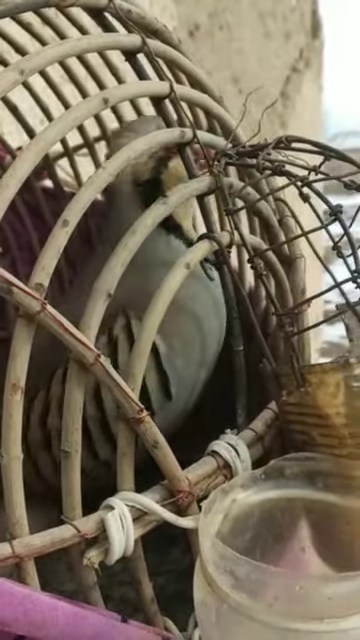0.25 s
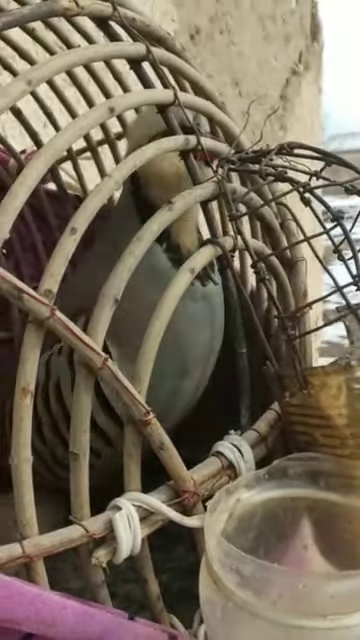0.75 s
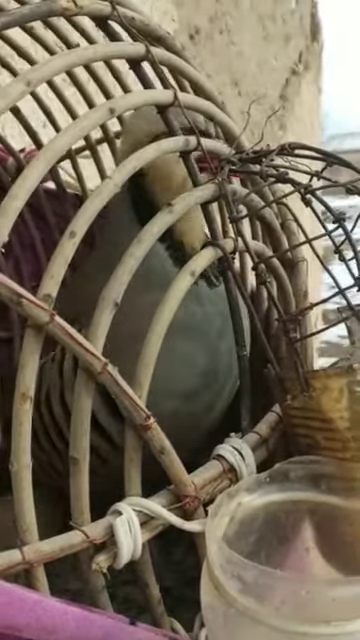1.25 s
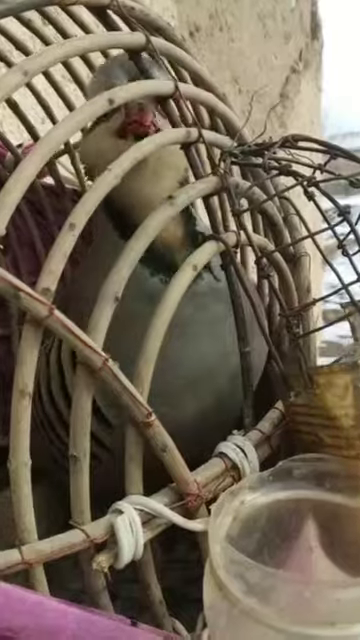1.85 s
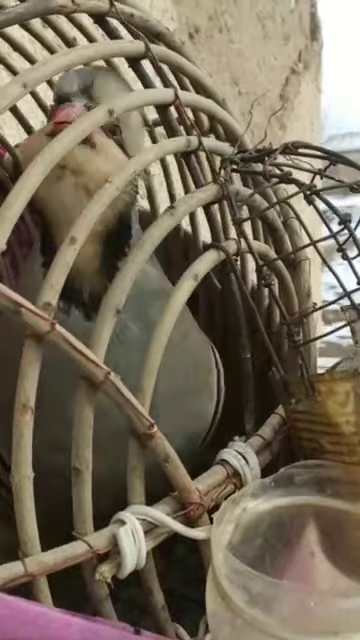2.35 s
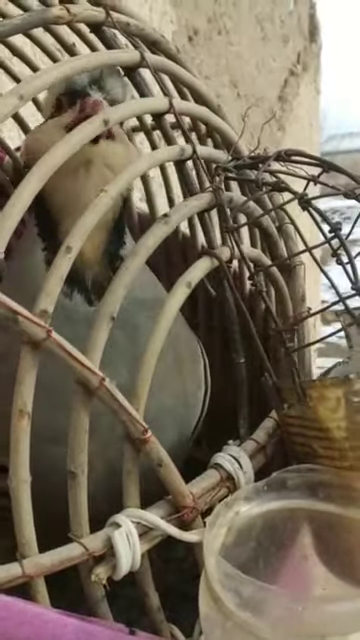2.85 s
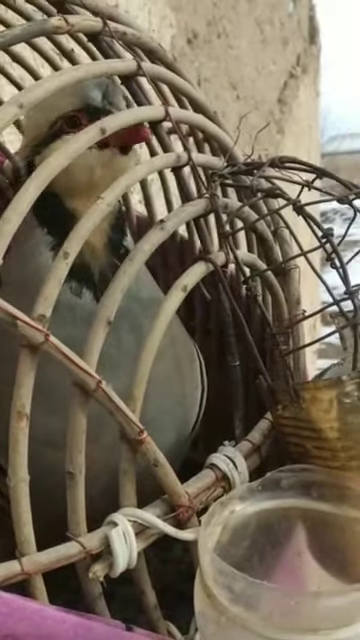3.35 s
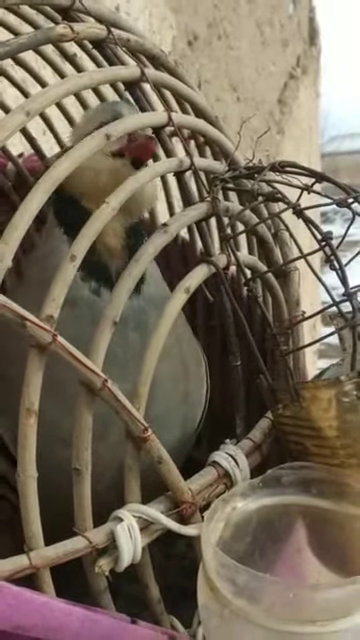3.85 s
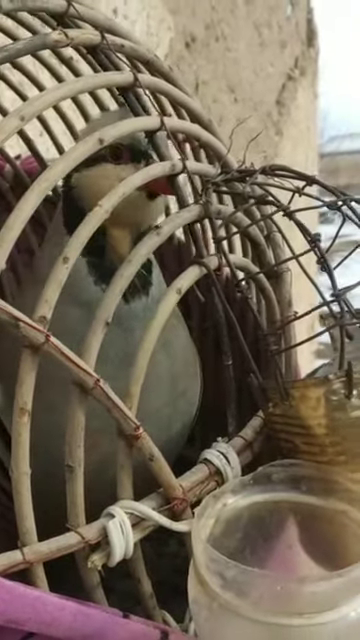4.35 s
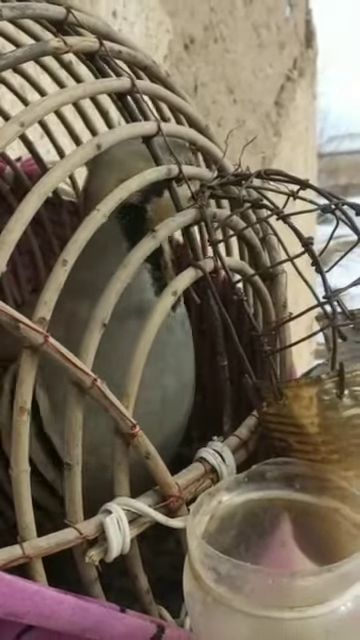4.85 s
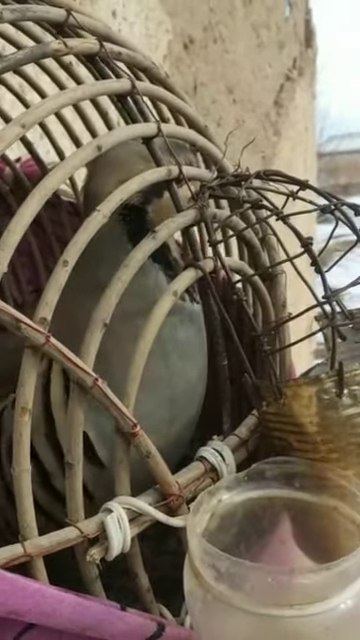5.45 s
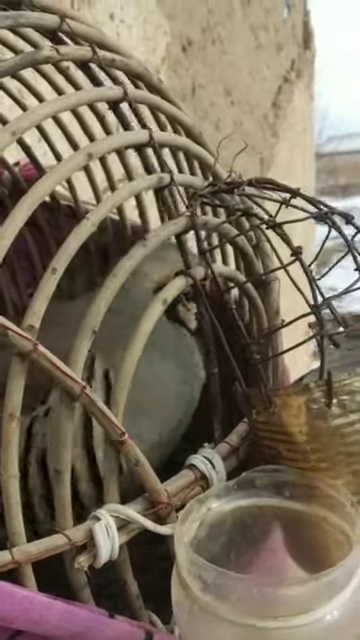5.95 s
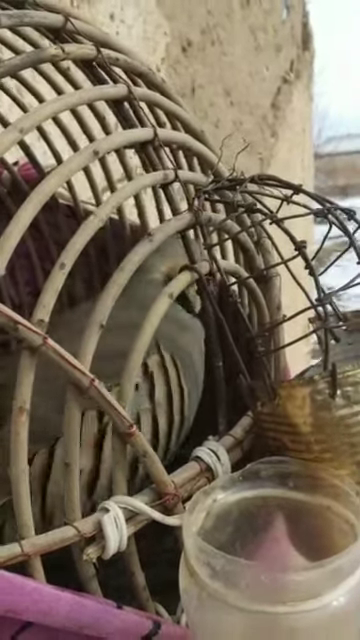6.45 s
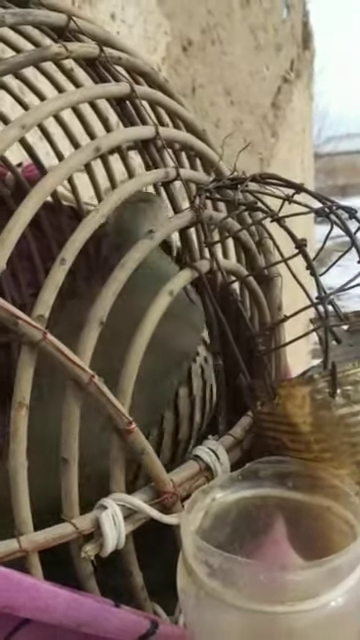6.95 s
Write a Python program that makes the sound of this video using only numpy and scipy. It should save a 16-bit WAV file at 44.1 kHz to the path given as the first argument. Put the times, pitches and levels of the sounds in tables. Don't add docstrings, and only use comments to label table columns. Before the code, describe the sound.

A caged partridge fires off a fast run of loud, hoarse chucks, then turns and eases into softer, rising squeals and whines in a quiet yard.

```python
import sys
import numpy as np
from scipy import signal
from scipy.fft import rfft, irfft
from scipy.io import wavfile
from scipy.ndimage import uniform_filter1d

SR = 44100
rng = np.random.default_rng(int(sys.argv[2]) if len(sys.argv) > 2 else 0)


def file_out(sig):
    cols = np.atleast_2d(sig).T
    lim = np.clip(cols, -1, 1)
    pcm = np.round(lim * 32767).astype(np.int16)
    wavfile.write(sys.argv[1], SR, pcm)


def volts_from_decibels(level):
    exponent = np.asarray(level, float) / 20
    return 10 ** exponent


N = 317520

# time in seconds, throat shift in octaves, treble in dB.
NECK = [(0, -0.06, -7), (.3, 0.041, -3.5), (.6, 0, -0.5), (1, -.03, -1), (1.4, .01, -1.5), (1.8, 0.013, 0),
        (2.1, -.06, -1.5), (2.5, -.06, 3.5), (2.9, -0.072, -2.5), (3.17, 0.044, -1.5), (3.6, -0.023, 0.5),
        (4.1, -0.049, -2.5), (4.8, 0.028, -1.5), (5.25, 0.0066, 2), (5.7, 0, 2), (6.1, -0.0013, -0.5),
        (6.6, 0.0099, 0), (7.2, -0.044, 0)]
# time in seconds, share of the front colour 0-1.
FACING = [(3.1, 0), (3.42, 1)]
RISE_S = .0055


def evened(x, size=None):
    if size is None:
        power = np.mean(x ** 2)
    else:
        power = abs(uniform_filter1d(x ** 2, size))
    return x / np.sqrt(power + 1e-20)


def read(points, hz):
    f, value = np.transpose(points)
    return np.interp(np.log(hz + 1), np.log(f + 1), value)


def hush():
    # frequency in Hz, level in dB per Hz.
    air = [(12, -72), (20, 8.5), (91, -20), (206, -26), (2730, -32.5), (6910, -36.5), (13900, -42),
           (16500, -45.5)]
    # frequency in Hz, left-right correlation 0-1.
    same_points = [(40, 0.67), (300, 0.37), (3000, .1)]
    frames, hz = N // 256 + 5, np.fft.rfftfreq(1024, 1 / SR)
    a, b, c, d, patches = rng.standard_normal((frames, 513, 5)).T
    patches = uniform_filter1d(patches, size=10, axis=0)
    patches = evened(uniform_filter1d(patches, size=12, axis=1))
    same = np.clip(read(same_points, hz), -1, 1)[:, None]
    left, other = a + 1j * b, c + 1j * d
    z = np.array([left, same * left + np.sqrt(1 - same ** 2) * other])
    z *= volts_from_decibels(read(air, hz)[:, None] + 2.0 * patches)
    noise = signal.istft(z, nperseg=1024, noverlap=768)[1][:, :N]
    return volts_from_decibels(-51) * evened(noise)


def steady_kinds():
    # start in seconds, length in seconds, effort in dB, pitch from in Hz, pitch to in Hz.
    chucks = [(.114, 0.038, -10.5, 752.3, 329.2), (.533, 0.027, -5, 731, 330.4),
              (.504, .022, -10, 749, 518.6), (.711, 0.034, -6.5, 489.6, 383.5),
              (.932, 0.032, -5.5, 695.8, 334.5), (1.213, 0.018, -6.5, 821.2, 500),
              (1.857, 0.02, -8.5, 708.7, 480.5), (1.88, 0.026, -4.5, 599.4, 326.5),
              (2.116, .022, -4.5, 607.7, 378), (2.142, 0.03, -9, 366.8, 267.3),
              (2.395, 0.0099, -7.5, 814, 517.6), (2.871, 0.022, -8, 364.6, 272.3),
              (1.706, .03, -7, 641, 330.5)]
    dives = [(.271, 0.033, -8.5, 785.8, 347), (.685, 0.022, -5, 598, 419.2),
             (1.097, 0.031, -6.5, 799.8, 396.8), (1.304, 0.028, -6.5, 556, 312.4),
             (1.457, 0.031, -8.5, 660, 300.1), (2.284, 0.032, -9, 500, 368.9),
             (2.476, 0.026, -7, 482.3, 340.2), (2.63, 0.03, -8, 634.6, 305.9),
             (2.846, 0.02, -8, 689.5, 411.4)]
    clucks = [(3.544, .027, -43, 762.4, 400.2), (.018, 0.037, -19, 488.7, 473.1),
              (.407, 0.025, -15, 454.4, 471), (.832, 0.028, -12.5, 677, 445.9),
              (1.235, 0.023, -16.5, 487.4, 483.7), (1.576, 0.026, -13.5, 551.5, 452.8),
              (2.017, 0.023, -12.5, 563.7, 455.7), (2.411, 0.027, -13, 500, 483.5),
              (2.738, 0.021, -10.5, 841.6, 486.6)]
    leads = [(.483, 0.014, -16.5, 647.8, 604.9), (.67, 0.014, -13.5, 642.3, 599.4),
             (1.399, 0.015, -11, 584, 542.9), (1.292, .007, -24, 600, 561.3),
             (2.093, 0.015, -21, 606.3, 593), (2.272, 0.0083, -9.5, 595.6, 567.3),
             (2.38, 0.0088, -21.5, 602.6, 704.3), (2.58, 0.04, -13.5, 602.7, 558.4),
             (3.099, 0.031, -13, 620.6, 560), (3.128, 0.031, -12.5, 482.4, 559.7),
             (5.2, 0.027, -27.5, 500, 616.8), (5.402, 0.018, -19.5, 453, 500)]
    trails = [(.216, 0.044, -18.5, 622.8, 600), (.562, .01, -23, 399, 328),
              (1.418, 0.021, -18, 537.6, 466.5), (6.222, .018, -38.5, 850.7, 857),
              (2.94, .06, -40, 640.9, 639.9), (.381, 0.013, -20, 701.5, 667.8),
              (1.132, 0.034, -13, 525, 523.2), (1.608, 0.057, -14, 803, 500),
              (1.792, .034, -17.5, 758, 601), (1.916, 0.025, -17.5, 481.6, 450),
              (2.447, 0.014, -18, 471.5, 384.3), (2.785, 0.041, -29.5, 649, 646),
              (2.915, 0.042, -25.5, 586.5, 563), (3.306, 0.04, -24.5, 694, 649),
              (3.366, 0.0023, -38, 602.6, 500), (3.885, 0.021, -33.5, 590.8, 580),
              (4.216, 0.03, -25.5, 547, 500), (4.925, 0.019, -37.5, 701.3, 646),
              (5.078, 0.034, -27.5, 638, 571.3), (.062, 0.028, -33.5, 639.7, 558.8),
              (6.595, 0.013, -37, 688.6, 582.5)]
    yaps = [
        (3.466, .025, -18, 588.8, 605.7),
        (3.724, .014, -19, 596.5, 639.5),
        (3.826, 0.05, -18.5, 625.5, 599),
    ]
    rasps = [
        (3.158, .05, -21.5, 758.5, 636.4),
        (5.859, 0.038, -46.5, 797.4, 592.2),
        (5.91, 0.038, -66, 599.4, 500),
        (6.28, 0.017, -59, 599.5, 500),
        (7.068, 0.02, -48, 670, 561),
        (6.7, 0.059, -44.5, 818, 601.2),
    ]
    scoops = [
        (1.678, 0.02, -3, 561.1, 632.9),
        (3.053, .012, -7, 540.7, 600.6),
        (3.071, 0.0071, -7, 595, 644),
    ]
    # part of the note 0-1, level in dB, glide 0-1, roughness 0-1,
    # throat in Hz, windpipe overtones in dB under the effort.
    chuck = [(0, 3.5, 0.03, 0.62, 1496, -21), (.25, -2.5, 0.36, 0.49, 1494, -8.5),
             (.6, -3.5, .7, 0.4, 1450, -11), (1.001, -7.5, 1, 0.38, 1356, -20)]
    dive = [(0, -3.5, 0, 0.46, 1710, -21), (.25, 3.5, 0.35, 0.36, 1542, -15),
            (0.601, -3, .7, 0.28, 1410, -14), (0.999, -7.5, 0.97, 0.29, 1214, -14.5)]
    cluck = [(0, 3.5, 0.041, 0.85, 1457, -8), (0.201, 4.5, 0.62, 0.53, 1428, -9),
             (0.501, 5, 0.87, .2, 1469, -5), (1, -5, 0.99, 0.083, 1172, -6.5)]
    lead = [(0, -17.5, .011, .6, 1752, -11), (1, -4, 1, .55, 1423, -13.5)]
    trail = [(0, -3, .061, .4, 1601, -10), (1, -8.5, 1, .35, 1343, -13)]
    yap = [(0, -4, 0.012, .5, 1278, -3), (0.598, 1.5, 1, .65, 1335, -2.5), (0.999, -4, 1, .6, 1220, -1.5)]
    rasp = [(0, 4, 0.057, .6, 1538, -2.5), (0.549, 7.5, .4, .6, 1333, 0.86), (0.998, 2.5, 1, .7, 1150, -2)]
    scoop = [(0, -15, 0.0092, .45, 1137, -15.5), (0.999, 1, 1, .4, 1365, -11.5)]
    return dict(chuck=(chucks, chuck), dive=(dives, dive), cluck=(clucks, cluck), lead=(leads, lead),
                trail=(trails, trail), yap=(yaps, yap), rasp=(rasps, rasp), scoop=(scoops, scoop))


def opening_kinds():
    # start in seconds, length in seconds, effort in dB, pitch from in Hz, pitch to in Hz.
    arcs = [(3.425, 0.042, -21, 559.4, 900), (3.925, 0.024, -19.5, 522.4, 688.6),
            (4.99, 0.039, -22.5, 479, 761.6), (5.424, 0.024, -21.5, 474.2, 657.3),
            (5.817, 0.026, -23, 381.3, 637.4), (6.24, .036, -27, 526.6, 640.6),
            (6.41, 0.027, -36, 743.7, 820), (7.022, 0.038, -27.5, 529, 680.6)]
    arches = [
        (3.636, .07, -18.5, 796.9, 641.5),
        (4.853, .066, -22.5, 801, 637.4),
    ]
    moans = [
        (3.968, .078, -21, 558, 440),
        (4.252, 0.071, -20.5, 545.3, 440),
        (4.585, .075, -18.5, 509, 430),
        (5.498, .055, -23.5, 563, 430),
    ]
    squeals = [
        (4.092, .076, -17, 577.5, 900),
        (4.382, .084, -17, 618.9, 931.8),
    ]
    drops = [
        (4.172, 0.035, -20, 789.5, 604.5),
        (4.47, 0.049, -17.5, 832, 622.3),
        (5.316, .044, -22.5, 759.2, 650.6),
        (5.712, .036, -22, 754.2, 634.3),
        (6.901, 0.04, -25, 1046, 650.5),
    ]
    cries = [
        (4.767, 0.075, -23, 600.3, 1003),
        (5.222, 0.081, -21.5, 601.6, 1005),
        (5.631, .073, -21, 593.7, 1024),
        (6.816, 0.08, -24.5, 725.6, 1111),
    ]
    whines = [
        (6.004, .156, -17, 640, 1144),
        (6.455, .125, -18, 638.6, 1145),
    ]
    chirps = [
        (6.962, 0.064, -36.5, 765, 1588),
    ]
    # part of the note 0-1, level in dB, glide 0-1, roughness (over 1 is air),
    # throat as a multiple of the pitch, windpipe overtones in dB under the effort.
    arc = [(0, -13.5, 0.0088, .4, 2.4, -6.5), (.6, 1, 1, .45, 2.2, -8.5), (1, -5, .7, .55, 2.2, -1)]
    arch = [(0, -7.5, .8, .5, 2.2, -22.5), (.25, 2, .5, 0.6, 2.1, -7), (0.552, 2, 0, .55, 2.02, -4),
            (1, -8.5, 1, .55, 2.02, -20)]
    moan = [(0, -10.5, .9, .5, 3.02, -15.5), (0.199, -3.5, .3, .4, 3.01, -6),
            (.4, -0.5, 0, .25, 3.01, -21.5), (.62, -3, .8, .3, 3.01, -16.5), (.75, -14, 1.1, .5, 3.05, -14),
            (1, -17, 1.2, .7, 3.3, -17.5)]
    squeal = [(0, -21.5, 0.015, .35, 1.5, -13), (0.118, -3, .15, .3, 2.02, -0.5), (0.3, 3, .3, .3, 1.8, 1),
              (0.5, 3, .8, .4, 1.8, 3), (.62, -9, 1, 1.6, 2.2, 4.5), (1.002, -15.5, 0.96, 1.8, 2.2, 1.5)]
    drop = [(0, -3.5, 0.0023, 0.45, 2.05, -2.5), (0.348, 2.5, .6, .4, 2.03, -1.5),
            (1.003, -7.5, 1, .5, 2.02, -4.5)]
    cry = [(0, -18, 0.0, .4, 1.37, -10), (.1, 3, .15, 0.43, 2.02, -2), (.2, 6, .4, .35, 2, -1),
           (.37, 9.5, 0.93, .4, 2.01, -3), (.46, -2, 0.97, 1.6, 1.7, 4.5), (.8, -13, 1, 1.8, 1.6, 15.5),
           (0.999, -11, .9, 1.8, 1.6, -1.5)]
    whine = [(0, -36.5, 0.017, 0.34, 1.5, -14), (.06, -6.5, .3, .3, 1.7, -2),
             (0.171, -2, .85, 0.35, 2.02, -2.5), (0.249, -3.5, 0.95, 1.8, 2.6, -1.5),
             (0.65, -11.5, 1, 1.8, 2.6, -5.5), (0.74, -9, 0.99, .4, 2.02, -4),
             (.87, -7.5, .25, 0.4, 1.8, -3.5), (1.001, -13, 0.2, 0.43, 1.9, -3.5)]
    chirp = [(0, 4.5, 0.088, 0.97, 3.1, -1), (0.449, 3.5, 0.76, 0.94, 3.1, -14), (1.001, 1, 1, .9, 3.2, -1)]
    return dict(moan=(moans, moan), arch=(arches, arch), arc=(arcs, arc), squeal=(squeals, squeal),
                cry=(cries, cry), drop=(drops, drop), whine=(whines, whine), chirp=(chirps, chirp))


def notes():
    # gullet in dB, throat's octave in dB,
    # beak hiss in dB, narrow ring of the throat in dB.
    sides_db = dict(chuck=(0.5, -4, -1, 3.5), dive=(-2.5, 0.5, -12, 5.5), cluck=(4.5, 6.5, 2.5, -7.5),
                lead=(3, 4.5, 13.5, -19.5), trail=(0.5, -17, 2.5, -6.5), yap=(-0.5, 3, -9, -32),
                rasp=(6.5, -23, -2, 0), moan=(-6.5, 9, 22, 4.5), arch=(1, -3, 0, -30),
                arc=(8, 12, -15, -76), squeal=(-2, 11, 26, -35), cry=(-3, -12, 29, 6),
                drop=(-0.5, -1.5, -12, -52), whine=(1, -14.5, 20.5, -31.5), chirp=(13, -12, -18, -25),
                scoop=(-5.5, 14, 4, -4.5))
    opening = opening_kinds()
    neck_s, neck_octaves, _ = np.transpose(NECK)
    out = []
    for kind, (rows, shape) in {**steady_kinds(), **opening}.items():
        part, db, glide, rough, throat, upper_db = np.transpose(shape)
        sides = np.outer(sides_db[kind], np.ones(len(part)))
        for start, length, effort_db, from_hz, to_hz in rows:
            hz = from_hz * (to_hz / from_hz) ** glide
            if kind in opening:
                throat_hz = throat * hz
            else:
                throat_hz = throat * 2 ** np.interp(start, neck_s, neck_octaves)
            s = start + part * length
            out.append(np.array([s, effort_db + db, hz, rough, throat_hz, upper_db, *sides]))
    return sorted(out, key=lambda note: note[0, 0])


def effort(t):
    rise_db, fall_s, fall_db = 30, 0.015, 47
    out = np.zeros(N)
    for s, db, *_ in notes():
        s = np.r_[s[0] - 3 * RISE_S, s[0] - RISE_S, s, s[-1] + fall_s, s[-1] + 3 * fall_s]
        db = np.r_[db[0] - 45, db[0] - rise_db, db, db[-1] - fall_db, db[-1] - 60]
        out = np.maximum(out, volts_from_decibels(np.interp(t, s, db, -150, -150)))
    return out


def syrinx(hz, rough):
    wander = evened(uniform_filter1d(rng.standard_normal(N), size=120))
    turns = np.cumsum(hz * np.exp((0.0061 + 0.35 * rough ** 2) * wander)) / SR
    pulses = sum(np.cos(2 * np.pi * k * turns) * (k * hz < 16500) / k ** 0.15 for k in range(1, 36))
    size_db = 4 * rough * rng.standard_normal(N)[turns.astype(int)]
    puffs = (0.03 + np.exp(-(turns % 1) / 0.28)) * rng.standard_normal(N)
    air = np.clip(0.1 + 0.3 * rough ** 2, 0, 1)
    mix = np.sqrt(1 - air) * evened(pulses, size=900) + np.sqrt(air) * evened(puffs)
    return volts_from_decibels(size_db) * mix


def resonate(x, hz, width):
    turn = np.exp(2j * np.pi * np.cumsum(hz * np.ones(len(x))) / SR)
    r = np.exp(-np.pi * width / SR)
    smooth = signal.lfilter([(1 - r) ** 2], [1, -2 * r, r * r], x / turn + 1e-18)
    return 2 * (turn * smooth).real


def body(x, modes):
    return sum((-1) ** k * volts_from_decibels(db) * resonate(x, hz, width) for k, (hz, width, db) in enumerate(modes))


def colour(x, points):
    hz = np.fft.rfftfreq(N, 1 / SR)
    smear = np.exp(-1j * (hz / 1500) ** 2)
    return irfft(rfft(x) * volts_from_decibels(read(points, hz)) * smear, N)


def patchy(x):
    dent_db, band_db = 3.5, 4.0
    hz, _, z = signal.stft(x, SR, nperseg=512)
    fine, broad = rng.standard_normal((*z.shape, 2)).transpose(2, 0, 1)
    dents = uniform_filter1d(uniform_filter1d(fine, size=3, axis=0), size=7, axis=1)
    dents = evened(dents - uniform_filter1d(dents, size=11, axis=0))
    bands = evened(uniform_filter1d(uniform_filter1d(broad, size=22, axis=0), size=9, axis=1))
    bands = bands * (hz > 6200)[:, None]
    return signal.istft(z * volts_from_decibels(dent_db * dents + band_db * bands), SR, nperseg=512)[1][:N]


def partridge():
    # frequency in Hz, width in Hz, level in dB.
    crop = [(297, 160, -18), (500, 1120, 3.5), (900, 353, 15)]
    # frequency in Hz, level in dB.
    behind_points = [(1800, -19.5), (2900, -8), (3600, -24), (4300, -9), (5500, 0), (6100, -9), (6600, -18),
                     (8200, -26), (9800, -29.5), (11500, -26), (14500, -25)]
    # frequency in Hz, level in dB.
    front_points = [(1500, -16), (2100, 9), (4000, 7.5), (5200, 3.5), (6200, -4), (7500, -5.5),
                    (10000, -33.5), (12000, -19.5), (15000, -31)]
    t = np.arange(N) / SR
    s, _, *columns = np.hstack(notes())
    hz, rough, throat_hz, upper_db, crop_db, octave_db, hiss_db, ring_db = (
        np.interp(t, s, c) for c in columns)
    rough = np.clip(rough, 0, 2.5)
    beak = np.log2(throat_hz / 1400)
    front = np.interp(t, *np.transpose(FACING))
    drive = syrinx(hz, rough * np.clip(1 - .45 * beak, .3, 1))

    throat = resonate(resonate(drive, throat_hz, 1075), throat_hz, 884)
    throat = evened(throat, size=900)
    ring = evened(resonate(throat, throat_hz, 380), size=900)
    throat = throat + volts_from_decibels(ring_db) * ring
    gullet = resonate(body(drive, crop), 305, 1066)
    gullet_db = crop_db - 10 - 8 * np.minimum(rough, 1) - 30 * np.minimum(beak, .9)
    gullet_db = gullet_db + 5 * front
    lower = evened(throat, size=900) + volts_from_decibels(gullet_db) * evened(gullet, size=900)

    rasp = drive + .55 * rng.standard_normal(N)
    upper = (1 - front) * evened(colour(drive, behind_points), size=900)
    upper += front * evened(colour(rasp, front_points), size=900)
    octave = evened(resonate(drive, 2 * throat_hz, 505.0), size=900)
    upper += volts_from_decibels(octave_db - 23.0 + 18.6 * beak - 60 * np.maximum(beak - 1.1, 0)) * octave
    hiss = evened(body(rng.standard_normal(N), [(11980, 2300, -0.22), (15300, 710, -1.77)]))
    upper += volts_from_decibels(hiss_db - 59.5 + 27.0 * np.minimum(beak, 1.25)) * hiss
    neck_s, _, treble_db = np.transpose(NECK)
    upper = patchy(upper) * volts_from_decibels(np.interp(t, neck_s, treble_db) - 2)

    lower_share = np.sqrt(np.clip(1 - volts_from_decibels(2 * upper_db), .15, 1))
    return effort(t) * (lower_share * evened(lower, size=900) + volts_from_decibels(upper_db) * upper)


def wall(x):
    # frequency in Hz, t60 in seconds.
    decay = [(300, 0.17), (900, 0.11), (1500, 0.12), (2300, 0.11), (5000, 0.092), (10000, 0.14)]
    taps = np.zeros((2, SR // 2))
    at = np.arange(200, SR // 2 - 20, 20)
    at = at + rng.integers(0, 20, (2, len(at)))
    np.put_along_axis(taps, at, rng.choice([-1., 1.], at.shape), 1)
    hz, t, z = signal.stft(taps, SR, nperseg=256)
    tail = signal.istft(z * volts_from_decibels(-60 * t / read(decay, hz)[:, None]), SR, nperseg=256)[1]
    return signal.fftconvolve(x[None], tail / np.linalg.norm(tail[0]), axes=1)[:, :N]


def scatter(x):
    # frequency in Hz, random phase between the ports in radians.
    port_blur = [(300, 0.3), (3000, 0.66), (8000, 0.94), (15000, 0.77)]
    hz, _, z = signal.stft(x, SR, nperseg=256)
    chance = uniform_filter1d(rng.standard_normal(z.shape[1:]), size=4, axis=0)
    chance = evened(uniform_filter1d(chance, size=3, axis=1))
    side = np.array([.5, -.5])[:, None, None]
    shift = np.exp(1j * side * read(port_blur, hz)[:, None] * chance)
    return signal.istft(z * shift, SR, nperseg=256)[1][:, :N]


def whistle(rows, octave_db):
    # part of the note 0-1, level in dB, share of the top pitch.
    pipe = [(0, -8, .88), (.15, 0, .96), (.4, 0, 1), (.68, -2, .985), (.82, -7, .94), (1, -11, .72)]
    beat_share = .295
    t, out = np.arange(N) / SR, np.zeros(N)
    waver, flutter, beat = (
        evened(uniform_filter1d(uniform_filter1d(rng.standard_normal(N), size=200), size=100))
        for _ in range(3))
    part, shape_db, share = np.transpose(pipe)
    for start, length, db, top_hz, side_db in rows:
        s = start + part * length
        turn = 2 * np.pi * np.cumsum(top_hz * np.interp(t, s, share) * np.exp(.012 * waver)) / SR
        under = 2 * np.pi * np.cumsum(beat_share * top_hz * np.exp(.03 * beat)) / SR
        edge_s = np.r_[s[0] - RISE_S, s, s[-1] + RISE_S]
        envelope_db = np.interp(t, edge_s, np.r_[-60, shape_db, -60], -150, -150)
        level = volts_from_decibels(db + 3.0 * flutter + envelope_db)
        for k, gain in ((1, 0.96), (2, volts_from_decibels(octave_db))):
            out += level * gain * (np.cos(k * turn) + volts_from_decibels(side_db) * np.cos(k * turn - under))
    return np.sqrt(2) * out


def second_membrane():
    # start in seconds, length in seconds, level in dB, top in Hz, sideband in dB.
    pipes = [
        (4.138, 0.043, -30.5, 2727, 3),
        (4.418, 0.059, -21.5, 2836, -8.5),
        (4.797, 0.048, -24, 3039, -11),
        (5.245, .07, -19.5, 2916, -4.5),
        (5.655, .055, -23, 2925, -0.5),
        (6.843, 0.067, -23.5, 3455, -30),
    ]
    thin_pipes = [
        (6.028, .095, -24, 3300, -5),
        (6.478, .068, -25, 3380, -2.5),
    ]
    return whistle(pipes, octave_db=-1.5) + whistle(thin_pipes, octave_db=-15)


def scene():
    # frequency in Hz, left minus right in dB.
    ports = [(380, -1), (1400, -1.7), (3000, 6.5), (4600, 4.5), (8000, -3), (15000, -6.5)]
    # time in seconds, left minus right in dB.
    drift = [(0, -2), (.7, -0.5), (1.6, -0.5), (3, 0.7), (3.7, -0.5), (4.2, 0.5), (5.6, -3.5), (6.2, 0.5),
             (7.2, -5)]
    # frequency in Hz, phase in radians.
    lag = [(0, 0), (2070, 1.9), (4700, 6.2), (13200, 24), (17000, 31)]
    bird = partridge() + second_membrane()
    t, hz = np.arange(N) / SR, np.fft.rfftfreq(N, 1 / SR)
    side = np.array([[.5], [-.5]])
    small_body = np.hypot(1, (230 / (hz + 1)) ** 4)
    tone = rfft(bird) * volts_from_decibels(side * read(ports, hz)) / small_body
    late = side * np.interp(hz, *np.transpose(lag))
    front = np.interp(t, *np.transpose(FACING))
    direct = (1 - front) * irfft(tone * np.exp(-1j * late), N)
    direct = direct + front * irfft(tone * np.exp(-.85j * late), N)
    direct = scatter(direct) * volts_from_decibels(side * np.interp(t, *np.transpose(drift)))
    return direct + volts_from_decibels(-16.5) * wall(bird) + hush()


def gate(x):
    gate_db, cut_db, from_hz = 5.9, -35, 2500
    chance_db, db_per_octave = 3.2, 1.8
    hz, _, z = signal.stft(x, SR, nperseg=2048)
    power = (abs(z) ** 2).mean(0)
    db = 10 * np.log10(uniform_filter1d(power, size=10, axis=0)[::10] + 1e-16)
    chance = evened(uniform_filter1d(rng.standard_normal(db.shape), size=2, axis=1))
    under_db = uniform_filter1d(db, size=9, axis=0) - db + chance_db * chance
    under_db = np.repeat(under_db, 10, axis=0)[:len(hz)]
    octaves = np.log2((hz[:, None] + 1) / from_hz)
    shut = (under_db > gate_db - db_per_octave * octaves) & (octaves > 0)
    return signal.istft(z * volts_from_decibels(cut_db * shut), SR, nperseg=2048)[1][:, :N]


def roll_off(x):
    return signal.sosfilt(signal.butter(12, 16980, fs=SR, output="sos"), x)


def record(dry):
    held = np.tanh(dry * 1.1) / 1.1
    top_edge = signal.ellip(8, .5, 70, 16200, fs=SR, output="sos")
    held = signal.sosfilt(top_edge, held)
    return roll_off(gate(held))


dry = scene()
out = record(dry)
file_out(out)
```